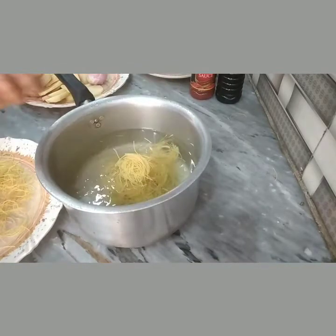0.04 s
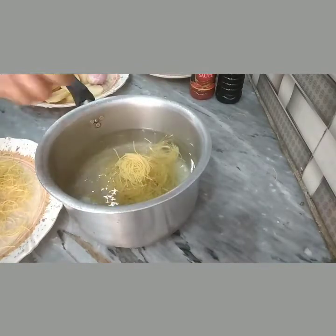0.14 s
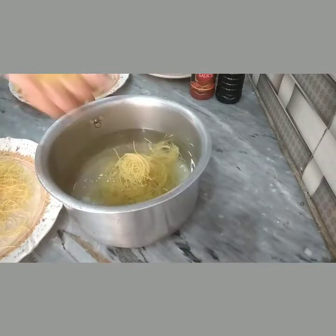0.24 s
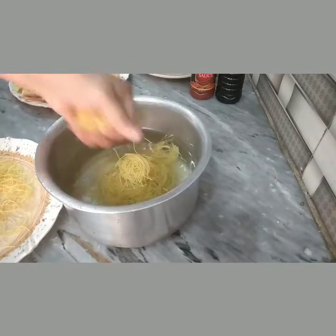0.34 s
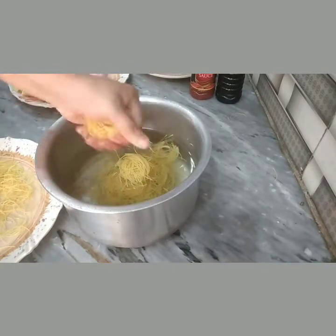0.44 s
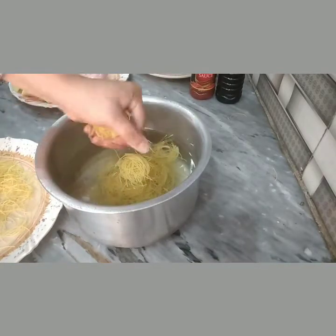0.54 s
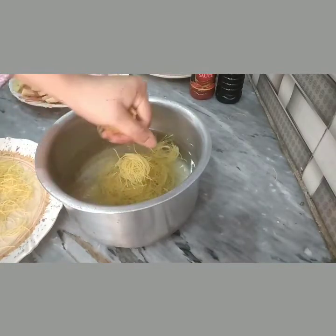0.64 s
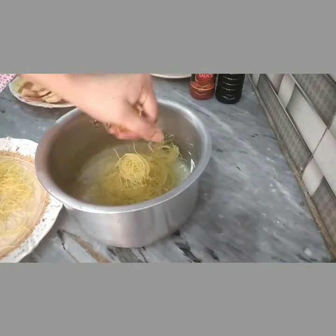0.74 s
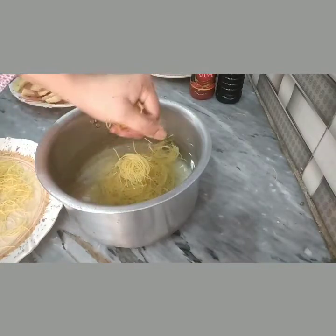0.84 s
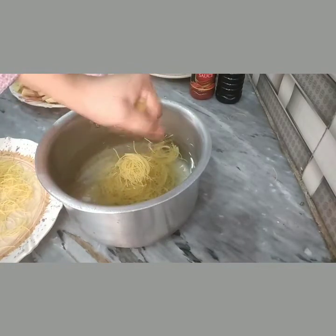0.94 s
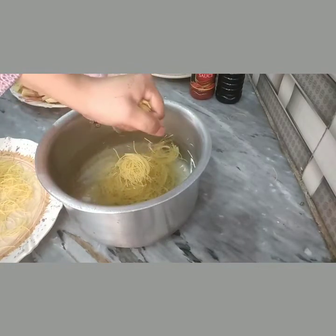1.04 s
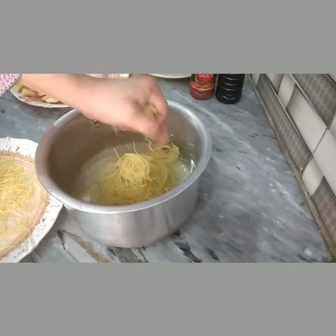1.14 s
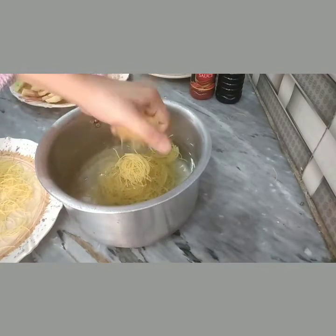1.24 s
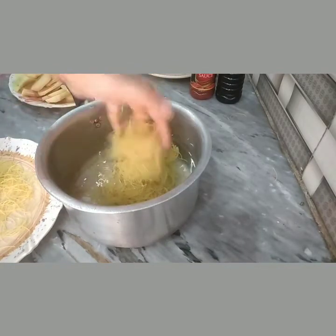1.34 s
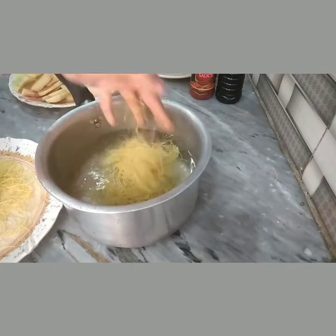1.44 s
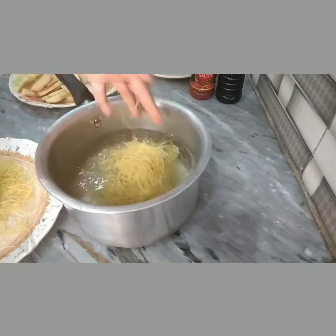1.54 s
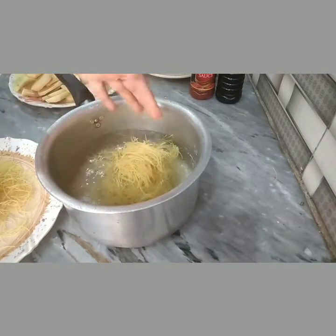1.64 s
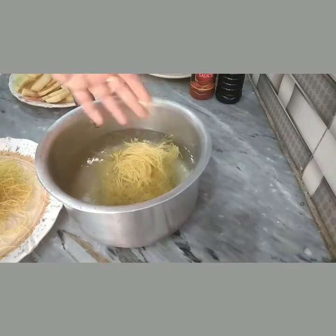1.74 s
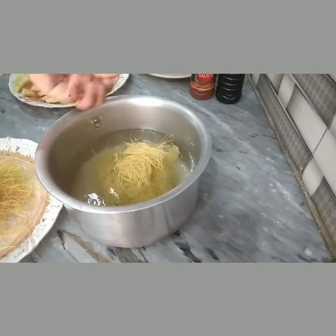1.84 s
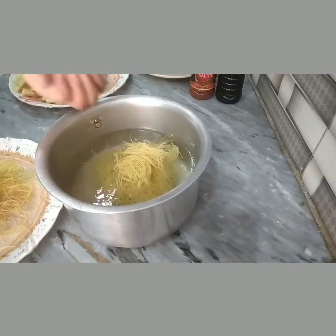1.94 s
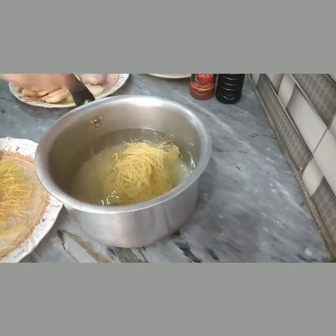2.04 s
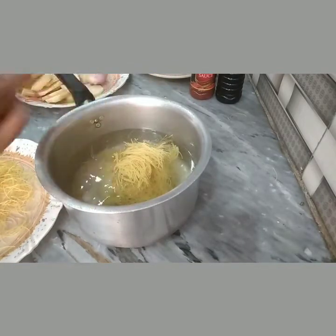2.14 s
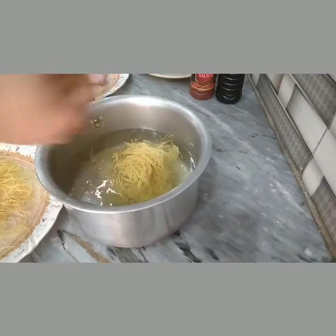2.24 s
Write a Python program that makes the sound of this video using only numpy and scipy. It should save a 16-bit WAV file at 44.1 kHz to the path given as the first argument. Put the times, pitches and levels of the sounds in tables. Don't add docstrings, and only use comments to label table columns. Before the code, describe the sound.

Brittle pasta strands are crushed by hand, dense sharp clicks growing to the strongest crunch around one second, then light dry brushing and soft counter bumps, over a faint kitchen hum, heard closely in stereo.

```python
import sys
import numpy as np
from scipy import signal
from scipy.fft import rfft, irfft
from scipy.io import wavfile
from scipy.ndimage import map_coordinates

SR = 44100
rng = np.random.default_rng(int(sys.argv[2]) if len(sys.argv) > 2 else 0)


def wav_out(sig):
    wavfile.write(sys.argv[1], SR, np.round(np.clip(np.atleast_2d(sig).T, -1, 1) * 32767).astype(np.int16))


def linear_from_db(decibels):
    return 10 ** (np.asarray(decibels, float) / 20)


N = 101430


def rms_one(x):
    return x / np.sqrt(np.mean(x ** 2) + 1e-20)


def drift(rate_hz):
    r = np.exp(-2 * np.pi * rate_hz / SR)
    settle = 9000
    return rms_one(signal.lfilter([1], [1, -2 * r, r * r], rng.standard_normal(N + settle))[settle:])


def peak(x, hz, width_hz):
    r = np.exp(-np.pi * width_hz / SR)
    turn = 2 * np.pi * hz / SR
    return signal.lfilter([(1 - r * r) / 2, 0, (r * r - 1) / 2], [1, -2 * r * np.cos(turn), r * r], x + 1e-18)


def ring(x, hz, t60_s):
    r = linear_from_db(-60 / (t60_s * SR))
    turn = 2 * np.pi * hz / SR
    return signal.lfilter([0, np.sin(turn)], [1, -2 * r * np.cos(turn), r * r], x + 1e-18)


def cut(x, hz, kind):
    return signal.sosfilt(signal.butter(2, hz, kind, fs=SR, output="sos"), x)


def over_time(table):
    s, *columns = np.transpose(table)
    return [np.interp(np.arange(N) / SR, s, column) for column in columns]


def hum():
    # pitch_hz [Hz], width_hz [Hz], level_db [dB]
    modes = [(37.45, 10, -61), (85.6, 22, -57.5), (153, 22, -53), (200, 120, -66)]
    sides_db = [-6.5, -9, -16, -7]
    out = np.zeros((2, N))
    for (hz, width_hz, db), side_db in zip(modes, sides_db):
        noise = rng.standard_normal((2, N))
        mid, side = peak(peak(noise, hz, width_hz), hz, width_hz * 2)
        out += linear_from_db(db) * rms_one(mid + linear_from_db(side_db) * side * [[1], [-1]])
    return out


def room_tone():
    # pitch_hz [Hz], level_db [dB per Hz]
    colour = [(15, -43.5), (25, -17), (162, -14), (264, -19.5), (747, -11), (944, -20), (2200, -20.5),
              (4000, -55.5), (5200, -90), (8800, -120)]
    level_db, alike = -66, 0.37
    hz, db = np.transpose(colour)
    f = np.maximum(np.fft.rfftfreq(N, 1 / SR), 1)
    shape = linear_from_db(np.interp(np.log(f), np.log(hz), db, right=-90))
    mid, side = irfft(rfft(rng.standard_normal((2, N))) * shape, N)
    return linear_from_db(level_db) * rms_one(np.sqrt(1 + alike) * mid + np.sqrt(1 - alike) * side * [[1], [-1]])


def shades(level_db, bright_db, weight_db):
    parts_db = [level_db, level_db + bright_db, level_db + weight_db, level_db + 2 * weight_db]
    return linear_from_db(np.array(parts_db) + 12.5)


def cracks():
    # time_s [s], level_db [dB], brightness_db [dB], weight_db [dB]
    pickup = [
        (0.045, -90, -3, -9),
        (0.073, -60.5, 11, -22),
        (0.185, -74, 16.5, 5.5),
    ]
    # time_s [s], level_db [dB], brightness_db [dB], weight_db [dB]
    squeezes = [
        [(0.19, -70, 9, -7), (0.194, -43.5, -0.5, -35), (0.222, -41, -2.5, -1.5), (0.318, -38, -4, -28),
         (0.385, -46.5, 1.5, -20)],
        [(0.39, -36, -11, -24.5), (0.472, -39.5, 1, -23.5), (0.592, -28, -5, -18), (0.668, -40.5, 5, -22),
         (0.688, -53, -3.5, -28)],
        [(0.695, -45, 2.5, -24), (0.739, -38.5, 1.5, -13.5), (0.745, -33, -3, -16), (0.809, -38.5, 0, -20),
         (0.822, -42.5, -0.5, -21)],
        [(0.833, -32, 0, -13), (0.852, -27.5, -1.5, -14), (0.914, -28.5, -0.5, -18.5),
         (1.012, -17.5, -6, -10.5), (1.165, -50, -4, -11.5)],
    ]
    # time_s [s], level_db [dB], brightness_db [dB], weight_db [dB]
    rub = [(1.171, -45, -2, -30), (1.26, -43.5, 0.5, -34), (1.36, -35, -8, -31), (1.45, -53, 5, -22),
           (1.62, -55, 2, -22), (1.665, -42, -3, -26), (1.71, -49, 1, -25), (1.79, -54, 1, -22),
           (1.852, -60, -6, -17)]
    breaks_per_s, spread_db, clump_db, clump_hz = 3000, 1.5, 1.5, 70
    path = pickup + sum(squeezes, []) + rub
    level_db, bright_db, weight_db = over_time(path)
    sizes = linear_from_db(spread_db * np.minimum(rng.exponential(1, N), 4)) * rng.choice([-1, 1], N)
    happens = rng.random(N) < breaks_per_s / SR
    grain = rms_one(sizes * happens * linear_from_db(clump_db * drift(clump_hz)))
    t = np.arange(N) / SR
    active = (t > path[0][0]) * (t < path[-1][0])
    return grain * active * shades(level_db - 6.5, bright_db + 9.5, weight_db + 19)


def snaps():
    # time_s [s], peak_db [dB], brightness_db [dB]
    ticks = [(0.0578, -49, -13), (0.0742, -30, 1), (1.1788, -33, -3), (1.2979, -30, -10),
             (1.3264, -30, -10), (1.6302, -25, -6), (1.6477, -23, -7), (1.6592, -30, -8), (1.746, -34, -10),
             (1.7694, -29, -12), (1.8253, -41, -12.5), (1.8472, -40, -16), (2.1142, -51, -9)]
    # time_s [s], peak_db [dB], brightness_db [dB], weight_db [dB]
    snap_rows = [(0.197, -19.5, -11.5, -24), (0.2074, -28, -19, -10), (0.2169, -17, -11, -15),
                 (0.2309, -19, -6, -6.5), (0.2483, -16, -9, -26), (0.2658, -17, -4, -11),
                 (0.2714, -13.5, -11, -21), (0.2848, -11, -20, -22), (0.2914, -11, -10, -32),
                 (0.3004, -18, -11, -36), (0.3152, -17, -13, -33), (0.3391, -15, -10, -42),
                 (0.3544, -27, -5, -25), (0.3915, -12, -14.5, -42), (0.4034, -21, -4.5, -35),
                 (0.4239, -10.5, -26, -37), (0.4444, -30, -2, -30), (0.4653, -23, -4, -30),
                 (0.4788, -22, 2, -35), (0.4913, -18, -8.5, -27), (0.5112, -17, -5.5, -36),
            (0.5327, -24, -1.5, -12), (0.5472, -10, -12, -25), (0.5791, -11, -32, -18),
            (0.5935, -11, -14, -25), (0.6094, -14, -32, -44), (0.6389, -23, -4, -35),
            (0.6948, -26, 4.5, -34), (0.7138, -27.5, 4, -18), (0.7484, -18.5, -7.5, -39),
            (0.7814, -25.5, 1.5, -29), (0.7911, -19.5, -4.5, -34), (0.8104, -28, 3.5, -16),
            (0.834, -21, -12, -21), (0.85, -18, -8, -14), (0.9103, -27.5, -15, -37),
            (0.9512, -11, -19, -19), (0.9956, -8, -12, -7.5), (1.0015, -4.5, -18, -6),
            (1.0144, -11, -24, -14), (1.0474, -13.5, -38, -9.5),
                 (0.7407, -24, -5, -30), (0.863, -19, -10, -25), (0.8765, -18, -12, -25), (0.886, -21, -10, -25),
            (0.9223, -18, -12, -30), (0.9358, -16, -12, -30), (0.9443, -17, -12, -30),
            (0.9655, -20, -12, -25), (0.975, -18, -12, -25), (0.988, -15, -12, -20),
            (1.0225, -11, -20, -18), (1.031, -14, -18, -18), (1.056, -18, -18, -10), (1.068, -20, -18, -12),
            (1.1144, -28, -15, -25)]
    splinter_s, brush_s, splinter_db, brush_db, brush_weight_db = 0.003, 0.011, -13, -14, -38
    length = 1500
    t = np.arange(length) / SR
    out = np.zeros((4, N + 2000))
    rows = [(*row, False) for row in snap_rows]
    rows += [(s, db, bright_db, brush_weight_db, True) for s, db, bright_db in ticks]
    for s, db, bright_db, weight_db, is_brush in rows:
        spray = rng.standard_normal(length) * (rng.random(length) < 0.1)
        if is_brush:
            burst = spray * np.exp(-t / brush_s) * linear_from_db(brush_db)
        else:
            burst = spray * np.exp(-t / splinter_s) * linear_from_db(splinter_db) + (t == 0)
        gains = shades(db + 5.5, bright_db + 8.5, weight_db + 21.5)
        i = int(s * SR)
        out[:, i:i + length] += burst * gains[:, None]
    return out[:, :N]


def scattered(drive):
    echo_db = [-6, -1, -8, -8]
    echo_t60_s, alike = 0.04, 0.02
    r = linear_from_db(-120 / (echo_t60_s * SR))
    tail = np.sqrt(signal.lfilter([0, 1 - r], [1, -r], drive ** 2, axis=1)) * linear_from_db(echo_db)[:, None]
    shared, left, right = rng.standard_normal((3, N))
    return [drive + tail * (np.sqrt(alike) * shared + np.sqrt(1 - alike) * own) for own in (left, right)]


def hand_and_pot(plain, k):
    # pitch_hz [Hz], width_hz [Hz], level_db [dB]
    closed = [(1250, 550, -5), (2000, 600, 0), (2380, 400, 4.5)]
    # pitch_hz [Hz], width_hz [Hz], level_db [dB]
    opened = [(1300, 500, -17), (2030, 280, 4.5), (2590, 220, 1)]
    right_db = [4, .1, -.5]
    # pitch_hz [Hz], level_db [dB], t60_s [s]
    pot = [(755, -44, .1), (1520, -39, .08), (1785, -33, .1), (1920, -34, .08), (1990, -28, .12),
           (2035, -32, .09), (2125, -34, .08), (2590, -32, .1), (3050, -45, .08)]
    # time_s [s], share [0-1], pot_db [dB]
    opening = [
        (0.3, .05, -18),
        (0.6, .4, -14),
        (0.8, .8, -11),
        (1.0, .8, -9),
        (1.1, .8, -9),
        (1.3, .6, -14),
        (1.8, .5, -14),
    ]
    # time_s [s], lag_s [s]
    lags = [(0.3, 0.00004), (0.6, 0.00002), (0.95, -0.00006), (1.1, -0.00005), (1.2, 0.0001), (1.9, 0.0001)]
    low_cut_hz = 800
    share, pot_db = over_time(opening)
    body = np.zeros(N)
    for weight, hollow in ((1 - share, closed), (share, opened)):
        source = plain * np.sqrt(weight)
        for j, (hz, width_hz, db) in enumerate(hollow):
            body += peak(source, hz, width_hz) * linear_from_db(db + k * right_db[j]) * (-1) ** j
    struck = plain * linear_from_db(pot_db)
    for hz, db, t60_s in pot:
        body += ring(struck, hz, t60_s) * linear_from_db(db)
    body = cut(cut(body, low_cut_hz, "high"), low_cut_hz / 2, "high")
    lag_s, = over_time(lags)
    return map_coordinates(body, [np.arange(N) - k * SR * lag_s], order=3)


def pot_weight(heavy, deep, k):
    # low_hz [Hz], high_hz [Hz], level_db [dB]
    bands = [(300, 1000, -26), (650, 900, -12)]
    left_lag_s = 0.0003
    low = np.zeros(N)
    for x, (low_hz, high_hz, db) in zip((deep, heavy), bands):
        low += cut(x, [low_hz, high_hz], "band") * linear_from_db(db)
    low = cut(low, 260, "high") + peak(heavy, 755, 40) * linear_from_db(-4)
    return np.roll(low * linear_from_db(4 * k - 6), int((1 - k) * left_lag_s * SR))


def port_treble(bright, k):
    # pitch_hz [Hz], width_hz [Hz], peak_db [dB], plain_db [dB]
    ports = [(7300, 1400, 9, -10), (10760, 870, 9, 2.5)]
    rub_from_s, rub_dull_hz, right_lag_s = 1.17, 9500, 0.00018
    hz, width_hz, peak_db, plain_db = ports[k]
    bright = bright * np.where(rng.random(N) < k * 0.24, -1, 1)
    rubbed = cut(bright, rub_dull_hz, "low") * linear_from_db(0.1) + bright * linear_from_db(-4.5)
    bright = np.where(np.arange(N) > rub_from_s * SR, rubbed, bright)
    top = cut(bright, 3240, "high") * linear_from_db(-18)
    top = top * linear_from_db(plain_db) + peak(top, hz, width_hz) * linear_from_db(peak_db)
    return np.roll(top, int(k * right_lag_s * SR))


def pasta():
    # time_s [s], left_minus_right_db [dB]
    hand = [
        (0.1, 7.5),
        (0.3, 2.5),
        (0.7, -0.5),
        (1.05, 0.5),
        (1.3, 0.5),
        (1.8, 3.5),
    ]
    delay_s = 0.00052
    out = []
    for k, (plain, bright, heavy, deep) in enumerate(scattered(cracks() + snaps())):
        heard = hand_and_pot(plain, k) - pot_weight(heavy, deep, k) + port_treble(bright, k)
        heard = heard - 0.45 * peak(heard, 3430, 250)
        out.append(np.roll(heard, int(delay_s * SR)))
    pan_db, = over_time(hand)
    return np.array(out) * linear_from_db([pan_db / 2, -pan_db / 2])


def bumps():
    # time_s [s], peak_db [dB], pitch_hz [Hz]
    knocks = [(0.242, -42, 158.6), (0.347, -42.5, 171), (0.703, -36.5, 101), (0.77, -35, 100.7),
              (0.891, -36.5, 90), (0.951, -34.5, 131.4), (1.312, -33.5, 153), (1.388, -35, 162.5),
              (1.436, -35.5, 156), (1.58, -36, 153), (1.639, -33.5, 158.4), (1.968, -40.5, 94.9),
              (2.249, -33.5, 164.5)]
    swell_s, t60_s, level_db, noise_db, side_rad = 0.011, 0.14, -3.5, -19, 0.25
    length = 9000
    t = np.arange(length) / SR
    swell = (1 - np.exp(-t / swell_s)) ** 2 * linear_from_db(-60 * t / t60_s)
    swell = swell / swell.max()
    phase = side_rad * np.array([[1], [-1]])
    out = np.zeros((2, N + length))
    for s, db, hz in knocks:
        noise = rng.standard_normal(length)
        for width_hz in (150, 200, 300):
            noise = peak(noise, 240, width_hz)
        knock = np.sin(2 * np.pi * hz * t + phase) + rms_one(noise) * linear_from_db(noise_db)
        i = int(s * SR)
        out[:, i:i + length] += linear_from_db(db + level_db) * swell * knock
    return out[:, :N]


def scene():
    return pasta() + (hum() + bumps()) * linear_from_db([[-0.6], [0.6]]) + room_tone()


def roll_off(x):
    return signal.sosfilt(signal.butter(12, 16800, fs=SR, output="sos"), x)


def record(dry):
    fade_s, cutoff_hz = 0.008, 15950
    fade = np.clip(np.arange(N)[::-1] / (fade_s * SR), 0, 1)
    limited = 2 * np.tanh(dry / 2) * fade
    top_cut = signal.cheby2(20, 50, cutoff_hz, fs=SR, output="sos")
    return roll_off(signal.sosfilt(top_cut, limited))


dry = scene()
out = record(dry)
wav_out(out)
```